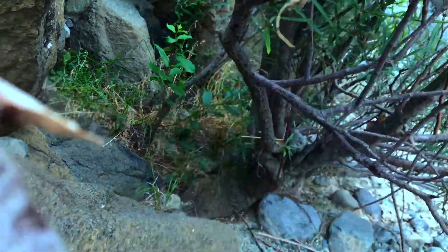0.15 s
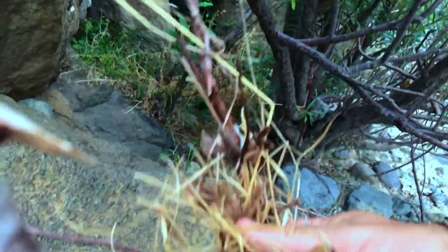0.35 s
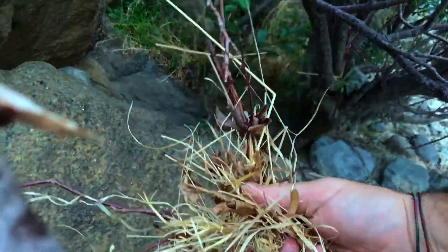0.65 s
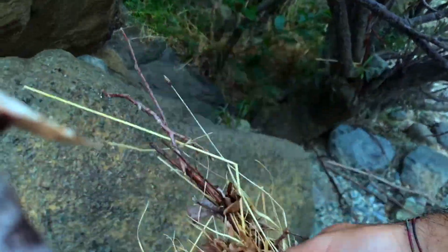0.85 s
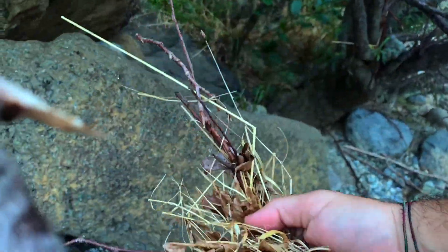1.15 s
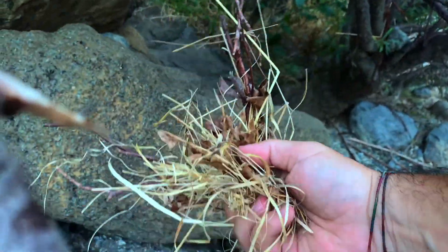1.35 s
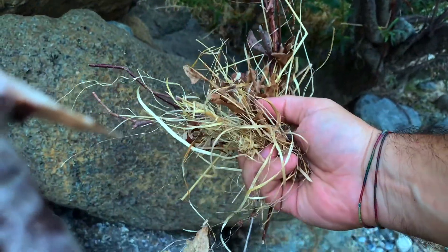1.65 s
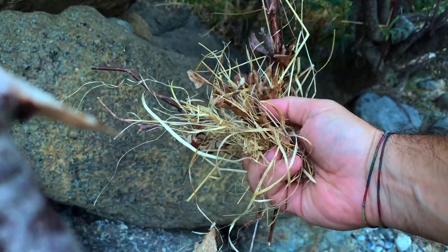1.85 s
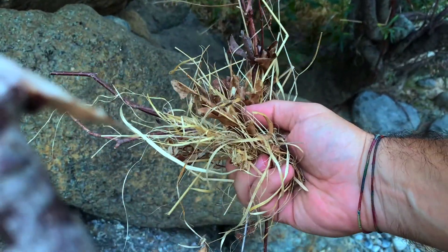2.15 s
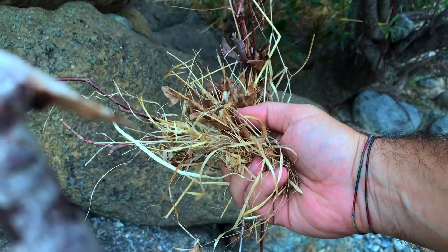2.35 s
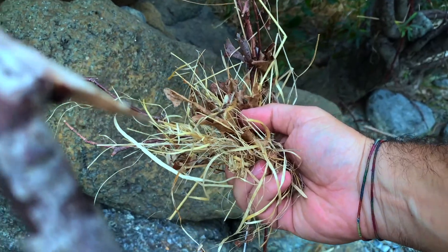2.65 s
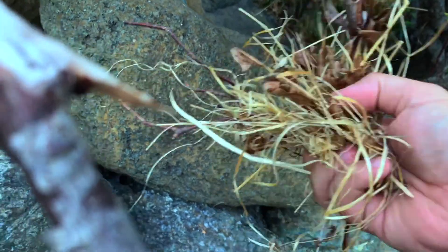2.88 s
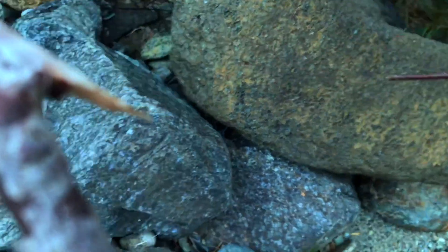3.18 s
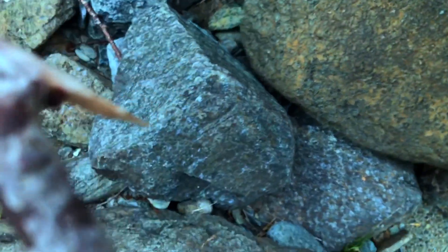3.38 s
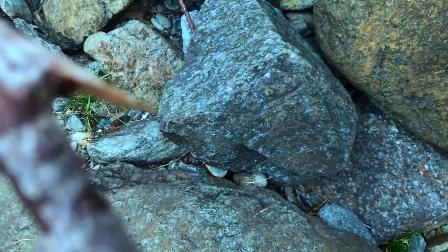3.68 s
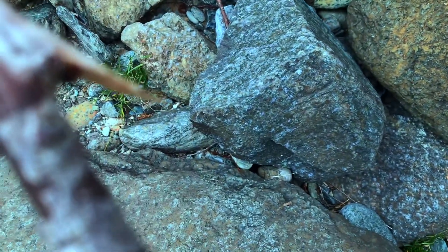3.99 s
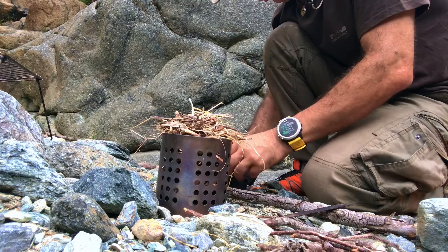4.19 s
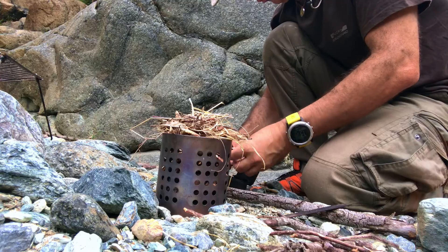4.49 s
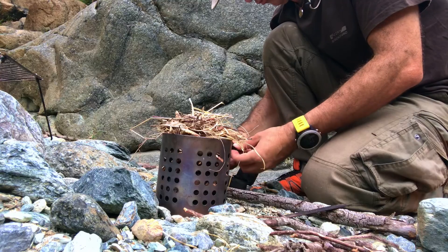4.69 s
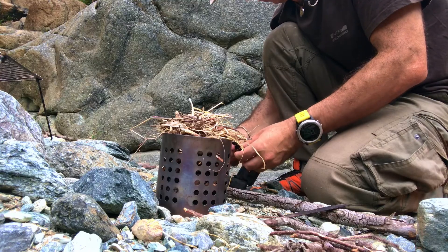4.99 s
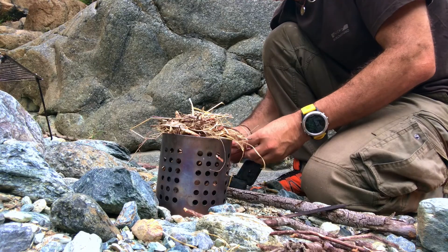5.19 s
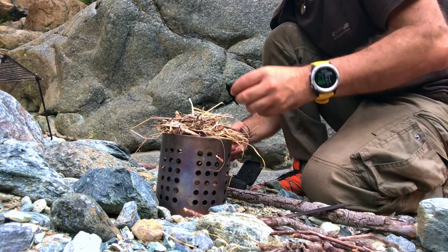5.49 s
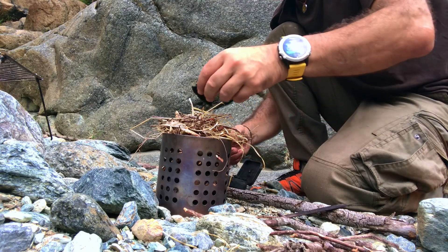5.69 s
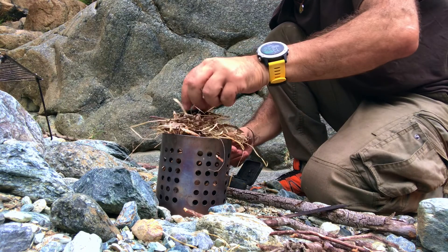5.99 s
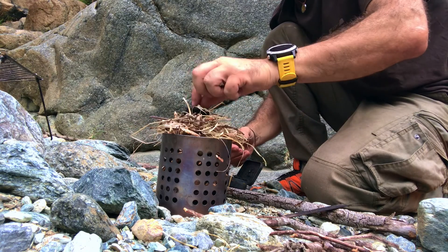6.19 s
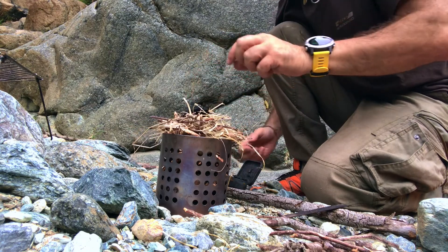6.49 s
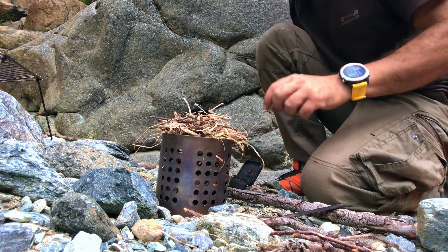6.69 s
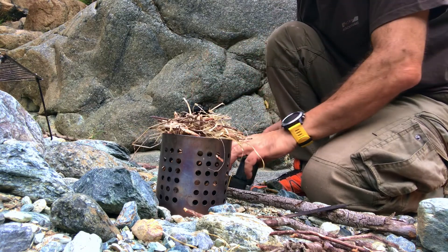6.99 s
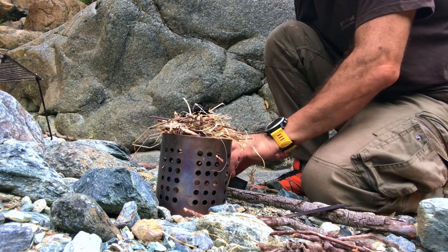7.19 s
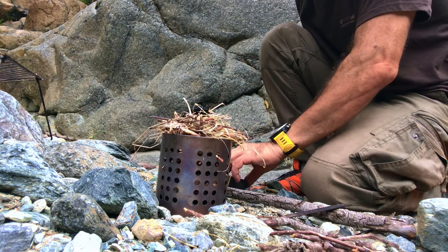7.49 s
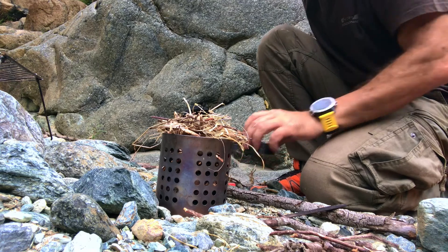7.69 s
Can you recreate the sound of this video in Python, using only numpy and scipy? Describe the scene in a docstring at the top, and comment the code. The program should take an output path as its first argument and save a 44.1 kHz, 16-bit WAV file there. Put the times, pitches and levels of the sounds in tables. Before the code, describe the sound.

Cicadas pulse in a high chorus over a faint stream, with a brief rustle of dry grass and a few stone clacks near the end.

```python
"""Cicadas, their buckling tymbals ringing hollow bodies, pulse about five times a second in the trees of a
rocky river bed, over the low murmur of the stream. At first dry grass rustles in a hand close by and the
hand-held microphone is bumped. At 4.2 s the scene cuts to a spot among boulders, where the cicadas are
farther off and bubbles gurgle. Near the end a small object is put down on loose stones, which ring in a
few clacks. Both channels carry the same sound."""
import sys
import numpy as np
from scipy import signal
from scipy.fft import rfft, irfft, next_fast_len
from scipy.io import wavfile

SR = 44100
rng = np.random.default_rng(int(sys.argv[2]) if len(sys.argv) > 2 else 0)


def digitize_waveform(pressure):
    """Quantize a signal to 16-bit integers and store it at the path in sys.argv[1].

    Rows of a 2-D input are taken as channels; values are limited to [-1, 1].
    """
    field = np.atleast_2d(pressure).T
    bounded = np.clip(field, -1, 1)
    quanta = np.round(bounded * 32767).astype(np.int16)
    wavfile.write(sys.argv[1], SR, quanta)


N = 346185
T = np.arange(N) / SR
CUT_S = 4.197   # from under the trees to among the boulders

# spectra of the stream at the two spots: (frequency [Hz], relative density [dB])
RUMBLE_SPECTRUM_TREES = [(28, -15), (50, -3), (120, 0), (200, -5), (330, -13), (600, -23), (1500, -65)]
WASH_SPECTRUM_TREES = [(250, -3.5), (430, -3), (560, -0.5), (720, -1), (1100, -0.5), (1700, -4.5),
                       (4000, -15)]
THRUM_SPECTRUM_ROCKS = [(25, -19), (60, -12), (95, 4.5), (160, -17), (300, -39)]
WASH_SPECTRUM_ROCKS = [(150, -7), (250, -6.5), (480, -6.5), (560, 0.5), (680, -11.5), (800, -13.5),
                       (980, -28.5), (1300, -27), (2000, -35)]
# surges of the stream's rumble (trees) and thrum (boulders): (time [s], relative level [dB])
RUMBLE_LEVELS = [(0, -57), (.9, -55), (2.0, -54.5), (2.4, -54.5), (2.55, -60), (2.72, -53.5), (3.3, -57.5),
                 (4.05, -55), (4.18, -64)]
THRUM_LEVELS = [(4.25, -62.5), (4.78, -59.5), (5.03, -69), (5.25, -62), (5.55, -60.5), (5.75, -64),
                (6.05, -59.5), (6.7, -64), (7.2, -59.5), (7.84, -64)]
# the stream's loudest gurgles: (time [s], relative level [dB], starting frequency [Hz])
LARGE_BUBBLES = [(4.261, -42.5, 562), (5.53, -43, 348), (5.82, -41, 526), (6.111, -43, 365),
                 (6.294, -38.5, 436), (6.488, -41.5, 530), (6.96, -46, 358), (7.149, -37, 522)]
# soft bumps on the microphone's body: (time [s], relative level [dB], frequency [Hz])
MICROPHONE_BUMPS = [(.115, -41.5, 59.7), (0.207, -38.5, 69.6), (0.394, -33.5, 64), (.46, -38.5, 55.3),
                    (.955, -43, 60.7), (1.375, -44, 85.5), (1.561, -41, 64.6), (1.63, -42, 55),
                    (6.876, -42, 96)]
# shifts of dry grass in the hand: (crest time [s], level [dB], half length [s])
GRASS_SHIFTS = [(0.026, -45, .04), (.25, -61, .3), (3.04, -56, 0.17), (3.27, -47.5, .06), (3.48, -55, .06),
                (3.8, -61, .4)]
# spectrum of the snapping stalks: (frequency [Hz], relative density [dB])
GRASS_SPECTRUM = [(2000, -25), (6000, 2), (10000, 0), (13500, 2.5), (16000, -7)]
# impacts on stones: (time [s], relative level [dB], centre frequency [Hz], spread [octaves])
STONE_IMPACTS = [(2.499, -37, 1010, 0.75), (7.2492, -28, 1700, 1.6), (7.277, -33.5, 1070, 0.17),
                 (7.339, -36, 1150, .3), (7.3459, -23.5, 1550, 0.84), (7.354, -30, 1700, 1.3),
                 (7.376, -37, 560, .6), (7.3893, -27, 520, 0.88), (7.423, -41.5, 1360, 0.27),
                 (7.476, -45, 1150, .54), (7.602, -45, 1120, .4)]
# normal modes of the stones: (frequency [Hz], relative level [dB], 60 dB decay time [s])
STONE_MODES = [(490, -2, 0.016), (570, 3, 0.029), (1102, -1.5, 0.03), (1290, -1, 0.016), (1787, 0.5, 0.022),
               (2300, 0.5, 0.022), (2630, -6, 0.018)]
# chirps of the cicadas in step: (crest time [s], level [dB])
CHIRP_CRESTS = [(0.109, -37), (0.312, -35.5), (0.517, -37.5), (0.706, -36), (0.922, -35.5), (1.1, -37.5),
                (1.301, -36.0), (1.493, -35.5), (1.707, -36.5), (1.911, -37.5), (2.108, -36.5),
                (2.319, -36.0), (2.522, -40.5), (2.684, -38), (2.91, -38), (3.086, -37.5), (3.273, -38.5),
                (3.464, -35.0), (3.684, -38.0), (3.859, -34), (4.071, -36.5), (4.372, -41), (4.585, -44),
                (4.795, -41.0), (4.988, -42.5), (5.195, -41.5), (5.402, -42.5), (5.595, -42.5),
                (5.789, -42), (5.981, -42.5), (6.175, -41), (6.368, -43.5), (6.561, -42.0), (6.773, -41),
                (6.98, -43.5), (7.16, -41.0), (7.367, -43), (7.573, -41.0), (7.778, -43)]
# spectra of the chirping group and the unbroken far chorus: (frequency [Hz], relative density [dB])
GROUP_SPECTRUM_TREES = [(1500, -33), (1850, -19), (2200, -10), (2800, -12), (3450, -17), (3750, -8.5),
                        (4050, -0.5), (4450, -1), (5200, -3.5), (7000, -7), (8600, -15), (10400, -24),
                        (11500, -20.5), (15500, -28.5)]
GROUP_SPECTRUM_ROCKS = [(1500, -42), (1850, -17), (2200, -5), (2800, -11.5), (3450, -23), (3750, -11.5),
                        (4100, 0.5), (5200, -2.5), (7000, -5), (8600, -11.5), (10400, -22), (12000, -20.5),
                        (13000, -22.5), (15500, -42)]
CHORUS_SPECTRUM_TREES = [(1500, -32), (1850, -20), (2200, -12), (2800, -15), (3450, -19.5), (3750, -12),
                         (4050, -5), (4450, -0.5), (5200, -5), (7000, -6.5), (8600, -16.5), (10400, -28.5),
                         (11500, -23.5), (15500, -35)]
CHORUS_SPECTRUM_ROCKS = [(1500, -15.5), (1850, -12), (2200, -4.5), (2800, -10.5), (3450, -18.5),
                         (3750, -15.5), (4050, -4), (4450, 1), (5200, -2), (7000, -4), (8600, -13),
                         (10400, -23.5), (11500, -26), (15500, -52)]
# envelope of a usual chirp at each spot: (level [dB], swell time [s], fade time [s])
USUAL_CHIRP_TREES = (-36.5, 0.036, 0.054)
USUAL_CHIRP_ROCKS = (-40.5, 0.037, 0.041)
# body modes of two single cicadas: (frequency [Hz], bandwidth per stage [Hz], relative level [dB])
SECOND_MODES = [(2980, 120, 1), (6180, 300, 1.5), (11100, 500, -10.5), (12700, 1400, -17)]
NEAREST_MAIN_MODES = [(4260, 260, -3.5), (4534, 250, 3.5)]
NEAREST_UPPER_MODES = [(5340, 93, 0)]
# effort of the second cicada: (time [s], level [dB])
SECOND_LEVELS = [(.3, -50), (1.3, -55), (1.7, -48), (2.7, -48), (3.25, -52), (4.1, -47)]
# song of the nearest cicada: (time [s], effort [dB], upper mode over main modes [dB])
NEAREST_EFFORT = [(.2, -0.5, -10), (.95, 0, 0), (1.35, -1, -2), (1.7, -1, -7), (3.25, 2, -9), (3.5, 4, -5),
                  (3.85, 4, -4), (4.07, 3, 5), (4.4, 0, -4), (5.15, 3, -5), (5.5, 2.5, -10),
                  (7.8, -0.5, -13)]


def from_db(db):
    """Amplitude grows tenfold for every 20 dB."""
    return 10 ** (np.asarray(db) / 20)


def unit_rms(x):
    """Normalisation to unit mean power."""
    return x / np.sqrt(np.mean(x ** 2) + 1e-20)


def envelope(levels):
    """Interpolation in decibels gives a gain for each sample."""
    return from_db(np.interp(T, *np.transpose(levels)))


def drift(per_s):
    """Random modulation: straight lines between Gaussian values, at unit rms."""
    knots = rng.standard_normal(int(N / SR * per_s) + 2)
    return unit_rms(np.interp(T * per_s, np.arange(len(knots)), knots))


def add(out, s, sound):
    """Superposition of a short sound, starting at time s."""
    at = round(s * SR)
    out[at:at + len(sound)] += sound[:len(out[at:])]


def coloured(x, spectrum):
    """Spectral shaping, interpolated in log frequency, at unit rms."""
    hz, db = np.transpose(spectrum)
    size = next_fast_len(N)
    bins = np.maximum(np.arange(size // 2 + 1) * SR / size, 1)
    gain = from_db(np.interp(np.log(bins), np.log(hz), db))
    gain *= np.minimum(bins / hz[0], 1) ** 2   # falls away below the first point
    return unit_rms(irfft(rfft(x, size) * gain, size)[:N])


def noise(spectrum):
    """Filtered white noise takes on the filter's spectrum."""
    return coloured(rng.standard_normal(N), spectrum)


def resonance(x, hz, width_hz):
    """A damped two-pole resonator with unit peak gain."""
    r = np.exp(-np.pi * width_hz / SR)
    feedback = [1, -2 * r * np.cos(2 * np.pi * hz / SR), r * r]
    return signal.lfilter(np.array([1, 0, -1]) * (1 - r * r) / 2, feedback, x)


def scatter(x, t60, wet_db):
    """Diffuse scattering off rocks and leaves adds noise that follows the sound's energy and decays."""
    r = np.exp(-2 * np.log(1000) / (t60 * SR))
    energy = signal.lfilter([1 - r], [1, -r], x * x + 1e-18)
    return x + from_db(wet_db) * np.sqrt(np.abs(energy)) * rng.standard_normal(N)


def off_rocks(x, echo_db, count=7):
    """Interference with hard reflections, 1 to 16 ms late, ripples the spectrum."""
    lags = (rng.uniform(.001, .016, count) * SR).astype(int)
    return x + from_db(echo_db) * sum(np.pad(x, (lag, 0))[:N] for lag in lags) / np.sqrt(count)


def stream_under_trees(wash_db=-59.0, wash_db_per_s=-.55):
    """Flow noise: a dull, surging rumble beneath a faint wash whose level slowly sinks."""
    rumble = from_db(.5) * envelope(RUMBLE_LEVELS) * noise(RUMBLE_SPECTRUM_TREES)
    return rumble + from_db(wash_db + wash_db_per_s * T) * noise(WASH_SPECTRUM_TREES)


def bubble(hz, decay_cycles=7, rise=0.35, onset_s=0.0062):
    """A bubble is a damped oscillator whose pitch rises a little."""
    t = T[:SR // 8]
    amplitude = (1 - np.exp(-t / onset_s)) * np.exp(-t * hz / decay_cycles)
    return amplitude * np.sin(2 * np.pi * hz * t * (1 + rise * t))


def stream_among_rocks(wash_db=-56.5, small_db=-56, spread_db=4, small_count=150):
    """Bubble resonances, a few loud and many faint, gurgle over a wash and thrum of flow noise."""
    out = from_db(wash_db + 1.14 * drift(14)) * noise(WASH_SPECTRUM_ROCKS)
    out += from_db(2.5) * envelope(THRUM_LEVELS) * noise(THRUM_SPECTRUM_ROCKS)
    small = [(CUT_S + when * (T[-1] - CUT_S), small_db + spread_db * (2 * loud - 1), 260 * 2.6 ** pitch)
             for when, loud, pitch in rng.random((small_count, 3))]
    for s, db, hz in list(LARGE_BUBBLES) + small:
        add(out, s, from_db(db) * bubble(hz))
    return out


def microphone_bumps(swell_s=0.0077):
    """Structure-borne sound: each bump is a heavily damped thud of a few cycles."""
    out, t = np.zeros(N), T[:SR // 4]
    pulse = t / swell_s * np.exp(1 - t / swell_s)
    for s, db, hz in MICROPHONE_BUMPS:
        add(out, s, from_db(db - 1.5) * pulse * np.sin(2 * np.pi * hz * t))
    return out


def grass(snaps_per_s=800, size_db=2.5):
    """Friction of dry stalks is a Poisson train of tiny snaps, swelling and dying with each shift."""
    power = sum(from_db(db) ** 2 * np.exp(-((T - s) / half_s) ** 2) for s, db, half_s in GRASS_SHIFTS)
    snaps = rng.random(N) < snaps_per_s / SR
    sizes = from_db(size_db * np.minimum(rng.exponential(1, N), 4))
    return np.sqrt(power) * coloured(snaps * sizes * rng.choice([-1, 1], N), GRASS_SPECTRUM)


def stone_clacks(contact_s=0.00051, crack_s=0.0037, echo_db=-9, echo_t60=0.22):
    """Impact excites a band of the stones' modes and a brief bright crack; the boulders reverberate."""
    out, t = np.zeros(N), T[:SR // 4]
    hz, mode_db, t60 = np.transpose(STONE_MODES)[:, :, None]
    for s, db, centre_hz, spread in STONE_IMPACTS:
        weight = from_db(mode_db) * np.exp(-.5 * (np.log2(hz / centre_hz) / spread) ** 2)
        detuned_hz = hz * (1 + .015 * rng.standard_normal(hz.shape))
        phase = 2 * np.pi * (detuned_hz * t + rng.random(hz.shape))
        modes = weight * np.exp(-np.log(1000) * t / t60) * np.sin(phase)
        ring = modes.sum(axis=0) / np.linalg.norm(weight)
        crack = from_db(-22) * spread * rng.standard_normal(len(t)) * np.exp(-t / crack_s)
        add(out, s, from_db(db) * (ring + crack) * (1 - np.exp(-t / contact_s)))
    echoes = rng.standard_normal(len(t)) * np.exp(-np.log(1000) * t / echo_t60)
    return out + from_db(echo_db) * signal.fftconvolve(out, echoes / np.linalg.norm(echoes))[:N]


def tymbals(per_s, jitter, uneven_db, count):
    """Buckling of the ribs gives each of count cicadas a fast, uneven train of impulses."""
    clicks = np.zeros(N)
    for _ in range(count):
        rate = per_s * np.exp(.1 * rng.standard_normal() + jitter * drift(300))
        buckles = np.diff(np.floor(np.cumsum(rate) / SR + rng.random()), prepend=0) > 0
        clicks += buckles * from_db(uneven_db * rng.standard_normal(N)) * rng.choice([-1, 1], N)
    return unit_rms(clicks)


def body(clicks, modes):
    """Resonance of a hollow body: two stages in cascade make each mode steep-sided."""
    return unit_rms(sum(from_db(db) * resonance(resonance(clicks, hz, width), hz, width)
                        for hz, width, db in modes))


def chirp_envelopes(loud_shortening=0.27, solo_length=0.87, solo_steepness=3.0, waver_db=1.0):
    """Power division: each chirp is shared by the group and the nearest cicada's main and upper modes."""
    powers = np.zeros((3, N))
    times, efforts_db, uppers_db = np.transpose(NEAREST_EFFORT)
    for (s, level_db), chance in zip(CHIRP_CRESTS, rng.standard_normal(len(CHIRP_CRESTS))):
        usual_db, swell_s, fade_s = USUAL_CHIRP_TREES if s < CUT_S else USUAL_CHIRP_ROCKS
        near = np.abs(T - s) < .25
        t = T[near] - s
        off_crest = np.abs(t / np.where(t < 0, swell_s, fade_s))
        # loud chirps are shorter and hold more of the nearest insect
        off_crest *= from_db(loud_shortening * (level_db - usual_db))
        excess_db = level_db - USUAL_CHIRP_TREES[0]
        solo_db = -2.5 + np.interp(s, times, efforts_db) + excess_db + waver_db * chance
        upper_db = np.interp(s, times, uppers_db)
        solo_share, upper_share = 1 / (1 + from_db([-solo_db, -upper_db]) ** 2)
        group = (1 - solo_share) * np.exp(-off_crest ** 2)
        solo = solo_share * np.exp(-(off_crest / solo_length) ** solo_steepness)
        parts = np.array([group, solo * (1 - upper_share), solo * upper_share])
        powers[:, near] += from_db(level_db) ** 2 * parts
    return np.sqrt(powers)


def cicadas_over_rocks(group_gain):
    """Attenuation with distance: group and far chorus are fainter from among the boulders."""
    clicks = scatter(tymbals(per_s=430, jitter=.25, uneven_db=1.8, count=4), t60=.04, wet_db=-1.5)
    far = scatter(tymbals(per_s=400, jitter=.3, uneven_db=3.0, count=5), t60=.1, wet_db=3.5)
    chorus_gain = from_db(-47.0 + 0.19 * drift(25))
    chorus = chorus_gain * coloured(off_rocks(far, echo_db=-15.5), CHORUS_SPECTRUM_ROCKS)
    flicker = from_db(0.13 + 0.46 * drift(70))
    group = flicker * group_gain * coloured(off_rocks(clicks, echo_db=-10), GROUP_SPECTRUM_ROCKS)
    return chorus + group


def cicadas_in_trees(group_gain):
    """Scattering blurs the far chorus into a steady sizzle; the close group's clicks stay grainy."""
    clicks = scatter(tymbals(per_s=430, jitter=.25, uneven_db=0.5, count=4), t60=.04, wet_db=0.0)
    far = scatter(tymbals(per_s=400, jitter=.3, uneven_db=2.0, count=5), t60=0.083, wet_db=1.5)
    chorus_gain = from_db(-40.0 + 0.33 * drift(25.02))
    chorus = chorus_gain * coloured(off_rocks(far, echo_db=-16), CHORUS_SPECTRUM_TREES)
    flicker = from_db(0.06 + .4 * drift(70))
    group = flicker * group_gain * coloured(off_rocks(clicks, echo_db=-10.5), GROUP_SPECTRUM_TREES)
    return chorus + group


def second_cicada(group_gain, lead_s=0.0049):
    """Amplitude gating: one insect with a lower ring chirps briefly, just ahead of the group."""
    gate = np.interp(T + lead_s, T, np.minimum(group_gain / from_db(-39.5), 1) ** 3)
    clicks = tymbals(per_s=480, jitter=.22, uneven_db=4.5, count=1)
    return envelope(SECOND_LEVELS) * gate * body(clicks, SECOND_MODES)


def nearest_cicada(main_gain, upper_gain):
    """Impulse excitation: tymbal clicks ring body modes whose balance shifts from chirp to chirp."""
    clicks = tymbals(per_s=560, jitter=.15, uneven_db=-0.5, count=1)
    main = from_db(-0.5) * main_gain * body(clicks, NEAREST_MAIN_MODES)
    upper = from_db(0.2) * upper_gain * body(clicks, NEAREST_UPPER_MODES)
    return main + upper


def scene():
    """Superposition of the sources at two spots in turn; the second fades in over 15 ms."""
    group_gain, main_gain, upper_gain = chirp_envelopes()
    nearest = nearest_cicada(main_gain, upper_gain)
    trees = cicadas_in_trees(group_gain) + nearest + second_cicada(group_gain)
    trees += stream_under_trees() + grass()
    rocks = cicadas_over_rocks(group_gain) + nearest + stream_among_rocks()
    fade_in = np.clip((T - CUT_S) / 0.015, 0, 1)
    mono = trees * (T < CUT_S) + rocks * fade_in + stone_clacks() + microphone_bumps()
    return np.array([mono, mono])


def record(dry, low_hz=29, high_hz=15700):
    """Band limiting removes the deepest bass and the highest treble."""
    x = signal.sosfilt(signal.butter(4, low_hz, "high", fs=SR, output="sos"), dry)
    return signal.sosfilt(signal.ellip(12, .1, 80, high_hz, fs=SR, output="sos"), x)


dry = scene()
out = record(dry)
digitize_waveform(out)
```